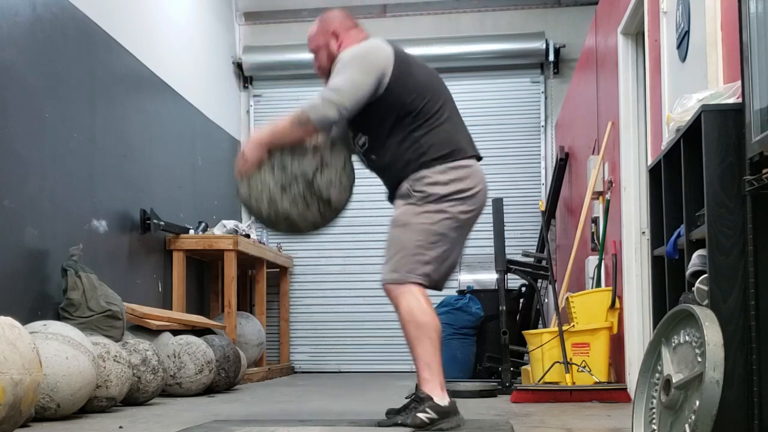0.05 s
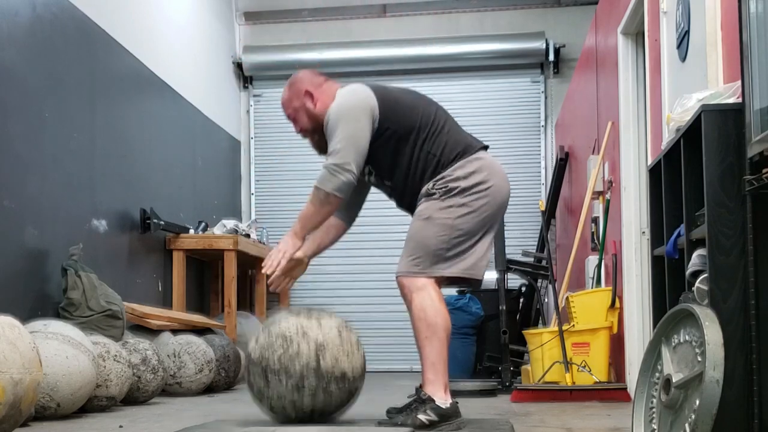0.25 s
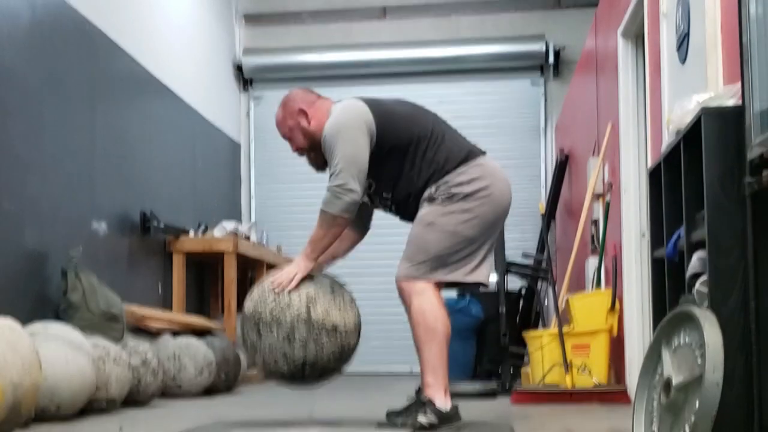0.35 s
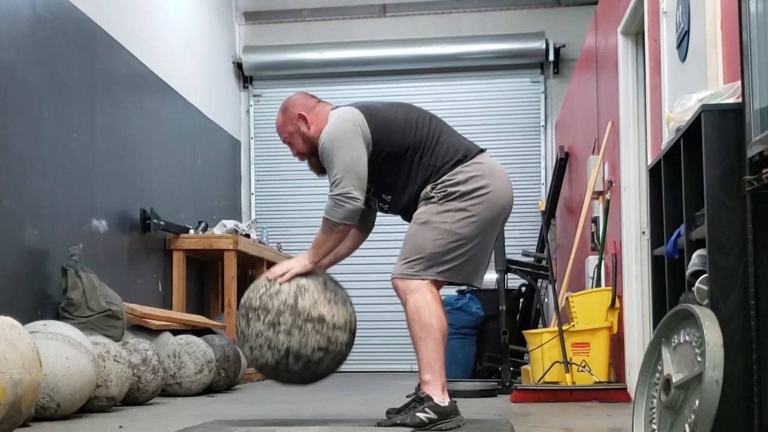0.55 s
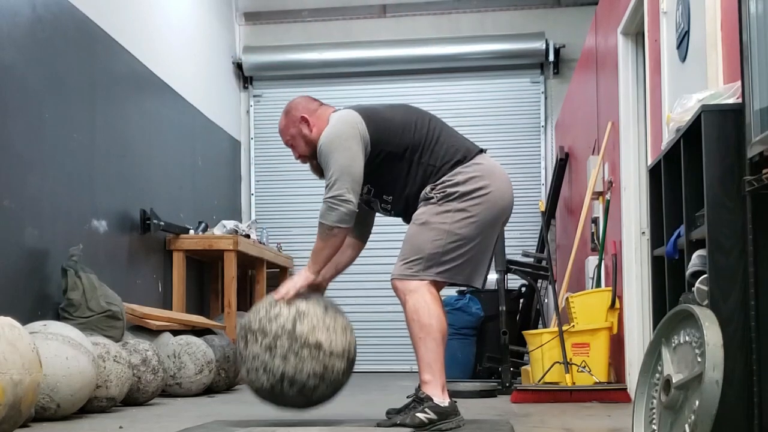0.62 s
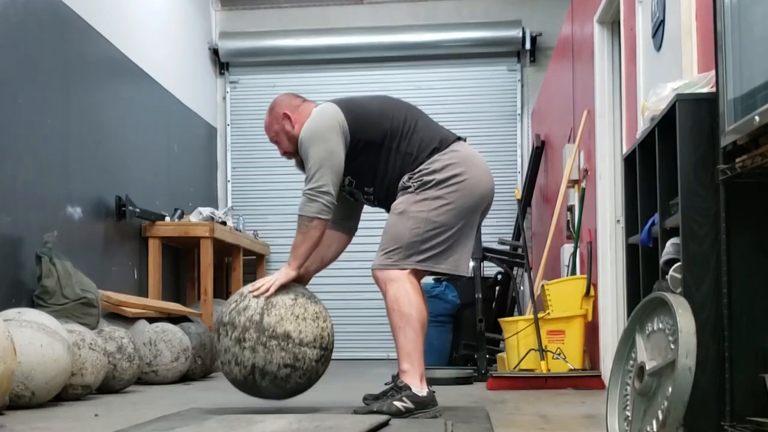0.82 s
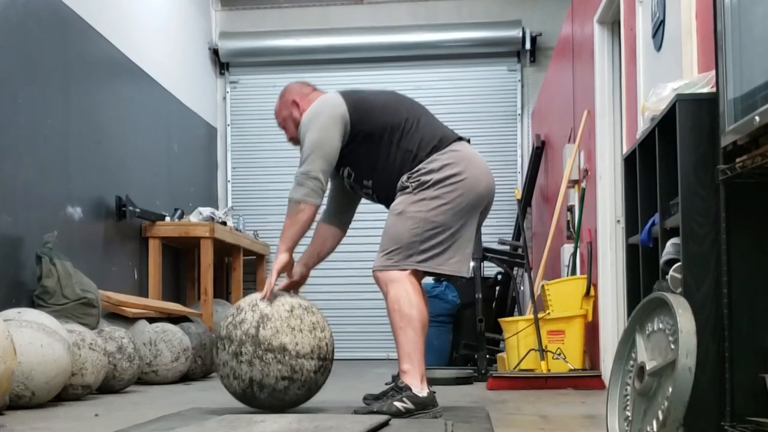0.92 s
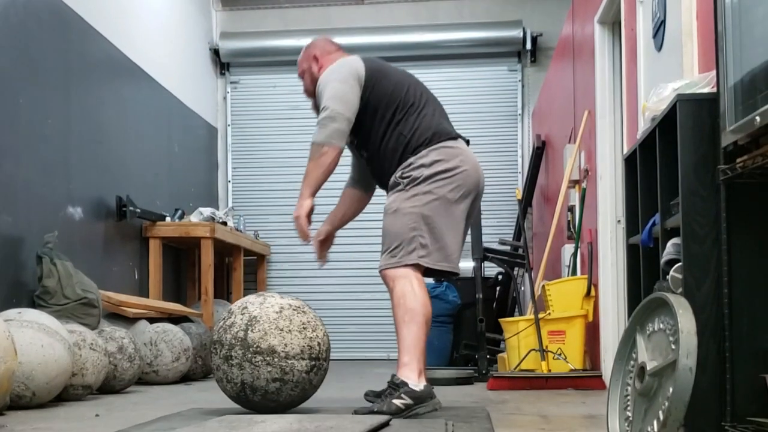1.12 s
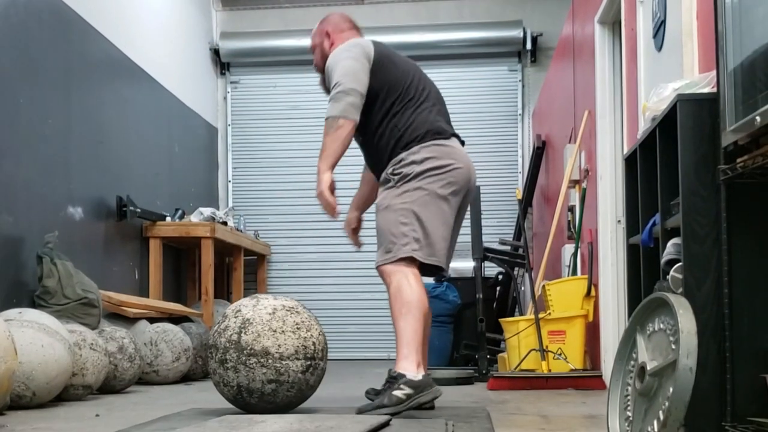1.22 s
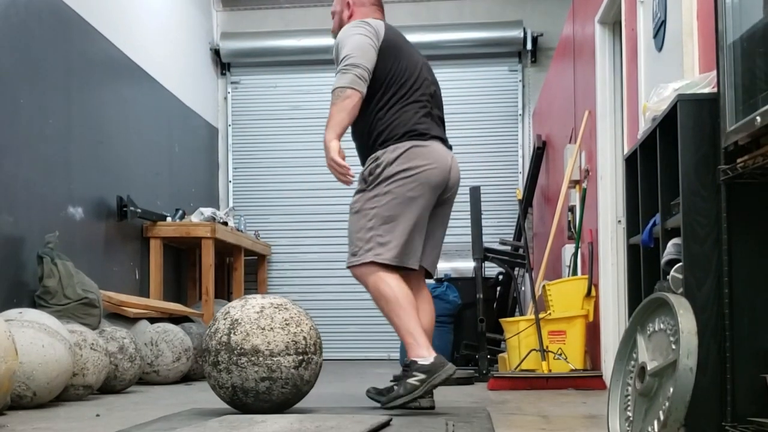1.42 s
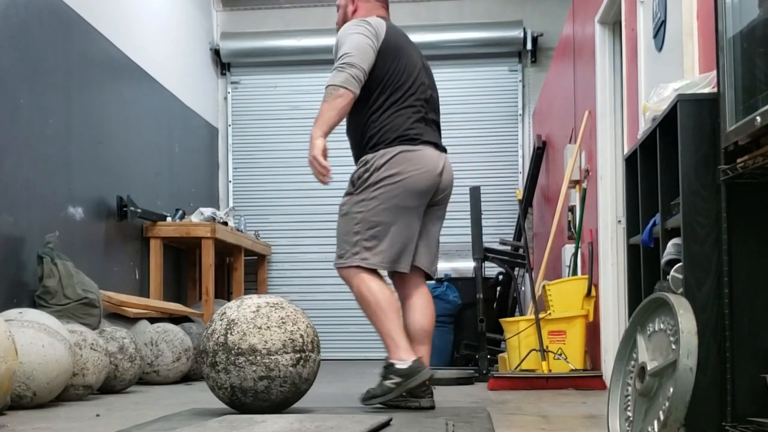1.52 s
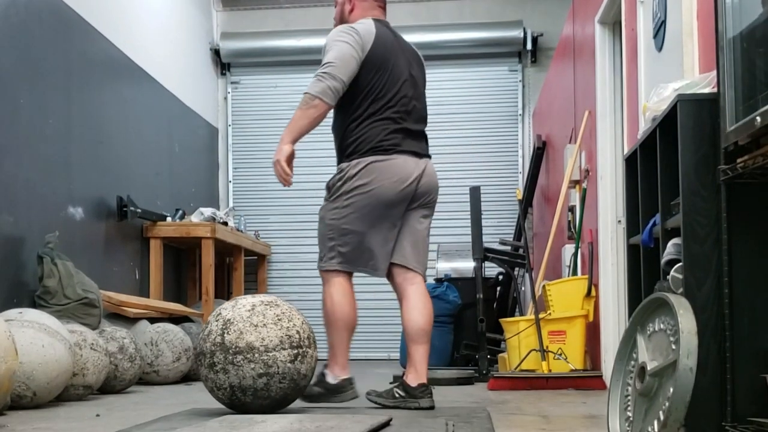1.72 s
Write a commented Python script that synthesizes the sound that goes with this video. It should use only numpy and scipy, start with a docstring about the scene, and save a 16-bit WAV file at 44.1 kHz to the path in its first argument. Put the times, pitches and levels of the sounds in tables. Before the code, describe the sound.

One loud, deep thud sounds as a stone ball hits a matted garage floor nearby, just after a faint rustle of clothing. Smaller, duller bounces follow and die away, with a light rattle of shelves and ticks of grit.

```python
"""Concrete ball bouncing in a garage

Cloth rustles as a heavy concrete ball leaves the arms. It drops on a rubber mat and bounces four times, ever
softer and duller. Each landing gives a small slap of the mat, then a thud that rings the floor and the room.
Shelves and the roller door rattle on as a hiss, and small, sharp ticks and cracks run through the floor around
the landings. Behind it a hum fades, and a thin, high sizzle stops after about a second."""
import sys
import numpy as np
from scipy import signal
from scipy.fft import rfft, irfft
from scipy.io import wavfile
from scipy.ndimage import uniform_filter1d

SR = 44100
rng = np.random.default_rng(int(sys.argv[2]) if len(sys.argv) > 2 else 0)


def generate_wav(sig):
    """Save sig (samples, or channels by samples) to the path in sys.argv[1] as 16-bit PCM at SR."""
    pcm = np.round(np.clip(np.atleast_2d(sig).T, -1, 1) * 32767).astype(np.int16)
    wavfile.write(sys.argv[1], SR, pcm)


N = 77175

# How strong each noise is from low to high pitch: pitch_hz, relative_db
CLOTH_TONE = [(350, -40), (600, -9.5), (1120, 1.5), (1410, -7.5), (1660, -5.5), (4930, -8), (7220, -18),
              (12100, -16), (15500, -20)]
HUM_TONE = [(24, -47.5), (40, -6), (114, 7), (172, -7), (286, -4), (610, -21.5), (1120, -28), (1300, -36),
            (1690, -58.5), (2860, -120)]
HISS_TONE = [(21, -28.5), (35, 6.5), (116, -11.5), (365, -28.5), (425, -15.5), (459, -35), (496, -29),
             (891, -27), (1310, -48), (15500, -60)]
SIZZLE_TONE = [(5000, -31), (7000, -8.5), (11300, -8.5), (12400, 1), (13500, -5.5), (15500, -6)]
KNOCK_TONE = [(300, -32.5), (450, 1.5), (650, 0), (950, -12.5), (1150, -13.5), (1400, -19.5), (1900, -31),
              (4000, -84.5)]
RATTLE_TONE = [(530, -35), (900, 0.5), (1290, -5.5), (1630, -10.5), (2170, -7), (2790, -12), (2960, -11),
               (4280, -17), (5170, -14), (7310, -26), (8530, -25), (15500, -34)]
# How loud each noise is as time passes: time_s, level_db
CLOTH_LEVELS = [(0.0, -47), (0.054, -49), (0.184, -48), (0.236, -53), (0.24, -54.5)]
HUM_LEVELS = [(0, -36), (.24, -50), (1.0, -42.5), (1.4, -64.5), (1.75, -71.5)]
HISS_LEVELS = [(0, -59.5), (1.0, -62.5), (1.4, -65.5), (1.55, -61.5), (1.75, -62)]
SIZZLE_LEVELS = [(0, -90.5), (.4, -72.5), (.99, -73.5), (1.09, -103), (1.75, -110)]
# Small, sharp ticks, most of them knocks and cracks through the floor around the landings: start_s, level_db,
# pitch_hz, cycles
SMALL_TICKS = [(.003, -35.5, 1190, 8.5), (.019, -32, 1296, 1.3), (0.2473, -30.5, 3300, 1.8),
               (.2450, -24.5, 753.6, 14.), (.2470, -29.5, 937, 14.), (.6575, -43, 1070, 12),
               (.253, -48, 3356, 2.8), (0.6547, -42, 2600, 2.8), (0.671, -32.5, 2080, 1.7),
               (0.909, -49, 3900, 1.3), (1.34, -65.5, 810, 7.4), (1.69, -69, 850, 8.)]
# The ball's landings: start_s, slap_db, slap_hz, push_delay_s, push_db, contact_s, rattle_db, knock_db
BALL_LANDINGS = [(0.2412, -42, 910, 0.007, -1, 0.0029, -38, -23.5),
                 (0.653, -38, 1510, .004, -7.5, 0.0039, -48, -33),
                 (0.8863, -34.5, 1085, 0.0052, -11.5, 0.0084, -61.5, -46),
                 (1.0401, -39, 960, 0.008, -11.5, 0.017, -70.5, -54.5),
                 (1.1431, -48.5, 950, .012, -24, 0.015, -79.5, -67)]
# How long the rattle lasts (a fade time is the time to drop 60 dB): pitch_hz, fade_s
RATTLE_FADES = [(900, .9), (2200, 1.094), (5000, .8), (6600, 0.88), (7600, 0.45), (15000, .4)]
# Pressure pulses from the floor and walls: time_s, level_db, length_s, sign
AIR_THUMPS = [(.2459, -1, 0.0038, -1), (.2503, 1, 0.0074, -1), (.2548, 0.5, 0.0049, 1),
              (.2660, -12, 0.0048, 1), (.6600, -20, 0.0052, -1), (.6674, -8, 0.01, -1),
              (.6758, -12.5, 0.0043, 1), (.9008, -12.5, 0.0081, -1), (1.0530, -26, 0.024, -1)]
# Notes at which the floor and room ring: pitch_hz, level_db, fade_s, sign
ROOM_NOTES = [(49.55, -10.5, 0.82, 1), (52.48, -20, 1.24, 1), (60.52, -12, 0.838, 1), (60.4, -28.5, 1.9, 1),
              (73.1, -15, 0.64, -1), (81.56, -18.5, 0.56, -1), (94.77, -12, 0.4, -1),
              (108.55, -19.5, 0.79, 1), (127.1, -18, 0.75, -1), (137.5, -15, 0.41, 1),
              (162.4, -9.5, 0.23, -1), (176.6, -18.5, 0.55, -1), (201.4, -20, 1.1, -1),
              (217, -17.5, .65, -1), (292, -20.5, .3, 1), (359.4, -25, .3, 1)]
# The room's blurred boom, band by band: pitch_hz, level_db, fade_s
BOOM_BANDS = [(65.9, -25, .8), (110, -23, 0.73), (180, -16, .8), (302, -15, 0.77), (420, -19, 0.78),
              (650, -22, 1)]
# The low noise the boom is cut from: pitch_hz, relative_db
BOOM_TONE = [(20, 0), (900, 0), (1300, -40), (20000, -60)]
# Stereo width, the part that differs between the ears against the shared part: pitch_hz, side_db
STEREO_WIDTH = [(60, -23), (110, -13), (200, -10.5), (380, -7), (700, -4), (1290, 2), (2380, -0.5),
                (4400, 0), (8120, 2), (15000, -4.5)]
# Which way the noises lean: pitch_hz, left_minus_right_db
STEREO_BALANCE = [(60, 1), (110, 0.0), (200, 1), (380, 0), (700, -2), (1290, -1.5), (2380, 0.5), (4400, -3),
                  (8120, -5), (15000, -6)]

TIME_S = np.arange(N) / SR
FREQS_HZ = np.arange(N // 2 + 1) * SR / N


def gain(db):
    """Turn decibels into a number to multiply by."""
    return 10 ** (np.asarray(db) / 20)


def pan(left_minus_right_db):
    """Gains for the left and right channels."""
    return gain(np.array([[left_minus_right_db], [-left_minus_right_db]]) / 2)


def db_by_pitch(table):
    """Join a table's points into a level for every frequency."""
    hz, db = np.array(table, float).T
    return np.interp(np.log(np.maximum(FREQS_HZ, 1)), np.log(hz), db)


def loudness(table):
    """Join a table's points into a gain for every moment."""
    return gain(np.interp(TIME_S, *np.array(table, float).T))


def noise(tone):
    """Stereo noise of strength 1, alike in both ears in the bass and different in the treble."""
    mid, side = rfft(rng.standard_normal((2, N))) * gain(db_by_pitch(tone))
    side = side * gain(db_by_pitch(STEREO_WIDTH))
    lean = gain(db_by_pitch(STEREO_BALANCE) / 2)
    stereo = irfft(np.array([(mid + side) * lean, (mid - side) / lean]), N)
    return stereo / np.sqrt(np.mean(stereo ** 2))


def split_bands(sound, table):
    """Split a sound into overlapping bands, one around each pitch in the table."""
    log_hz, spectrum = np.log(FREQS_HZ + 1), rfft(sound)
    centres = np.log([row[0] for row in table])
    return [irfft(spectrum * np.interp(log_hz, centres, row), N) for row in np.eye(len(table))]


def flicker(rate_hz, depth=1):
    """A gain that glides from one random level to the next."""
    step = int(SR / rate_hz)
    levels = np.repeat(rng.standard_normal(N // step + 1), step)
    return gain(2 * depth * uniform_filter1d(levels, step)[:N])


def rise_and_fade(start_s, fade_s, rise_s):
    """The loudness of something struck: a quick rise, then a steady fade."""
    age = np.maximum(TIME_S - start_s, 0)
    return (1 - np.exp(-age / rise_s)) * gain(-60 * age / fade_s)


def cloth_rustle():
    """Cloth slides off the ball and goes quiet once the ball is let go."""
    end_s, end_db = CLOTH_LEVELS[-1]
    levels = list(CLOTH_LEVELS) + [(end_s + 1, end_db - 151)]  # dies away at 151 dB a second
    return noise(CLOTH_TONE) * loudness(levels) * flicker(rate_hz=110)


def background_noise():
    """A wavering hum fades over a faint hiss; a thin, high sizzle swells and stops after about 1 s."""
    hum = noise(HUM_TONE) * loudness(HUM_LEVELS) * flicker(rate_hz=12, depth=2.5)
    hiss = noise(HISS_TONE) * loudness(HISS_LEVELS)
    sizzle = noise(SIZZLE_TONE) * loudness(SIZZLE_LEVELS) * flicker(rate_hz=90)
    return hum + hiss + sizzle


def tick(start_s, level_db, pitch_hz, cycles):
    """A small tap: a tone that swells and mostly dies within the given number of cycles."""
    cycles_done = np.maximum(TIME_S - start_s, 0) * pitch_hz
    swell = cycles_done * 4 / cycles
    return gain(level_db) * np.sin(2 * np.pi * cycles_done) * swell * np.exp(1 - swell)


def small_ticks():
    """Small, sharp ticks, most of them knocks and cracks through the floor around the landings."""
    return sum(tick(*row) for row in SMALL_TICKS)


def mat_slaps():
    """The ball slaps the rubber mat each time it lands."""
    return sum(tick(start_s, db, hz, cycles=2.1) for start_s, db, hz, *_ in BALL_LANDINGS)


def knocks():
    """Each landing makes a short, woody knock with a quieter tail from the room."""
    shape = 0
    for start_s, *_, knock_db in BALL_LANDINGS:
        hit = rise_and_fade(start_s, fade_s=0.099, rise_s=0.0013)
        tail = gain(-9.5) * rise_and_fade(start_s, fade_s=0.6, rise_s=0.0013)
        shape += gain(knock_db) * (hit + tail)
    return noise(KNOCK_TONE) * shape


def shelf_and_door_rattle():
    """Each landing shakes the shelves and door into a grainy hiss whose treble dies first."""
    rattle = 0
    for band, (hz, fade_s) in zip(split_bands(noise(RATTLE_TONE), RATTLE_FADES), RATTLE_FADES):
        power = 0
        for bounce, (start_s, *_, rattle_db, _) in enumerate(BALL_LANDINGS):
            dull_db = -6 if bounce > 0 and hz > 7000 else 0  # bounces shake the top less
            power += (gain(rattle_db + dull_db) * rise_and_fade(start_s, fade_s, rise_s=0.01)) ** 2
        rattle += band * np.sqrt(power) * flicker(rate_hz=100, depth=0.5)
    return rattle


def thumps():
    """The floor and walls answer the landings with short pulses of air pressure."""
    pulses = 0
    for time_s, level_db, length_s, sign in AIR_THUMPS:
        offset = 4 * (TIME_S - time_s) / length_s
        pulses += sign * gain(level_db) * (1 - 2 * offset ** 2) * np.exp(-offset ** 2)
    return pulses * pan(-1.5)


def floor_and_room_ring():
    """Each landing is a smooth push that sets floor and room ringing; a longer push sounds duller."""
    pushes = 0
    for start_s, _, _, delay_s, push_db, contact_s, _, _ in BALL_LANDINGS:
        bump = np.exp(-(4 * (TIME_S - start_s - delay_s) / contact_s) ** 2)
        pushes += gain(push_db) * bump / (contact_s * SR * 0.44)  # divide by the bump's area
    notes = 0
    for hz, level_db, fade_s, sign in ROOM_NOTES:
        shape = rise_and_fade(0, fade_s, rise_s=0.3 / hz)
        notes += sign * gain(level_db) * shape * np.sin(2 * np.pi * hz * TIME_S)
    boom = 0
    for band, (_, level_db, fade_s) in zip(split_bands(noise(BOOM_TONE), BOOM_BANDS), BOOM_BANDS):
        boom += gain(level_db) * rise_and_fade(0, fade_s, rise_s=0.0036) * band / band.std()
    ring = notes * pan(1.26) + boom
    return signal.fftconvolve(pushes[None], ring)[:, :N]  # every push starts the ring anew


def scene():
    """Add the ball's landings to the rattle, ticks, cloth and background noise."""
    landings = mat_slaps() + thumps() + floor_and_room_ring() + knocks()
    return landings + shelf_and_door_rattle() + small_ticks() + cloth_rustle() + background_noise()


def record(dry):
    """The microphone cuts the deep bass, rounds the loudest peaks and cuts the highest treble."""
    low_cut_hz, ceiling, high_cut_hz = 33, 2, 15620
    sound = signal.sosfilt(signal.butter(5, low_cut_hz, "high", fs=SR, output="sos"), dry)
    sound = ceiling * np.tanh(sound / ceiling)
    return signal.sosfilt(signal.ellip(12, .2, 70, high_cut_hz, fs=SR, output="sos"), sound)


dry = scene()
out = record(dry)
generate_wav(out)
```